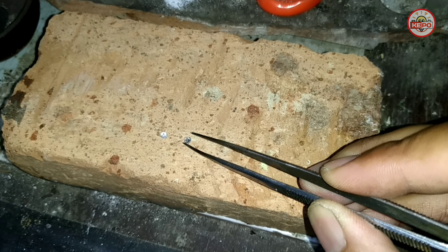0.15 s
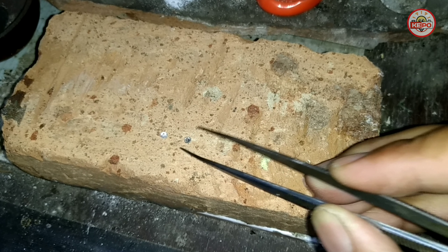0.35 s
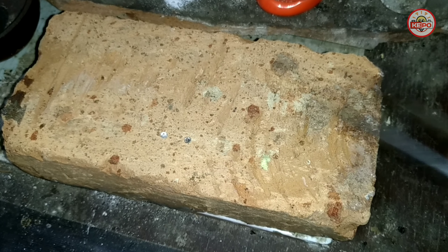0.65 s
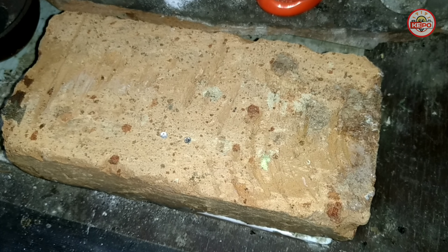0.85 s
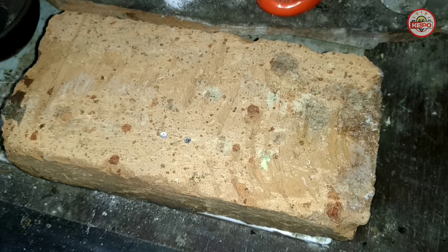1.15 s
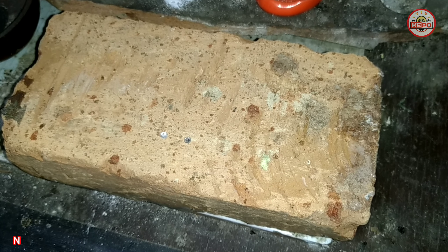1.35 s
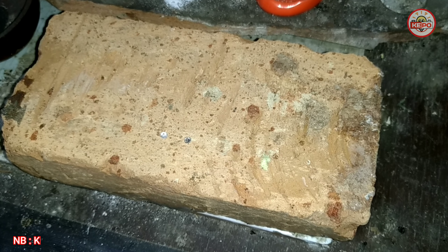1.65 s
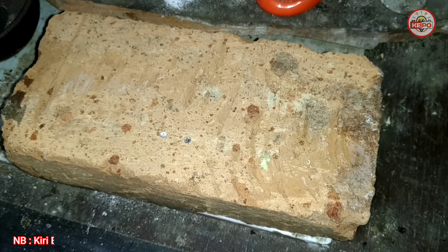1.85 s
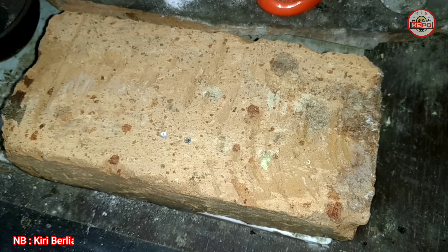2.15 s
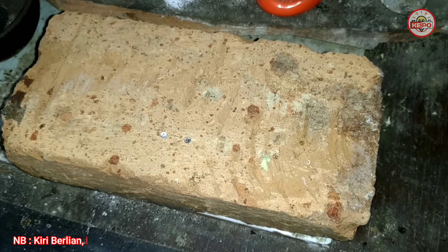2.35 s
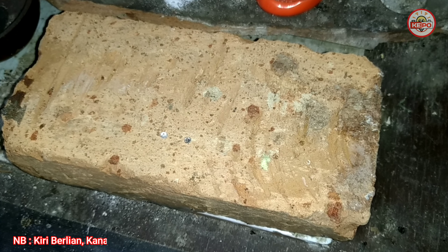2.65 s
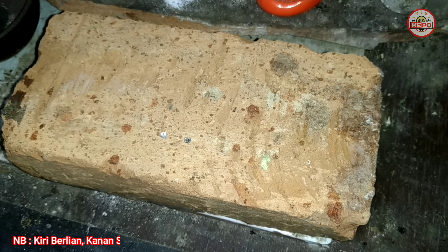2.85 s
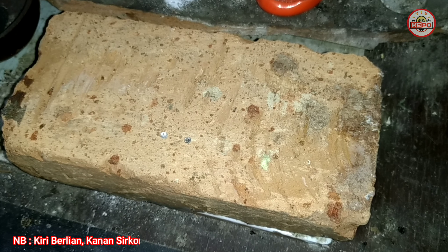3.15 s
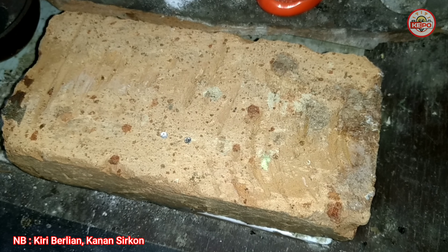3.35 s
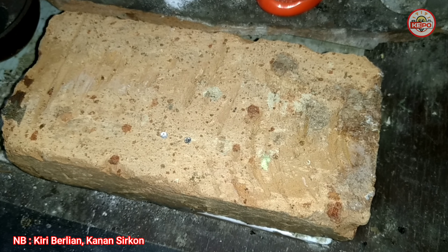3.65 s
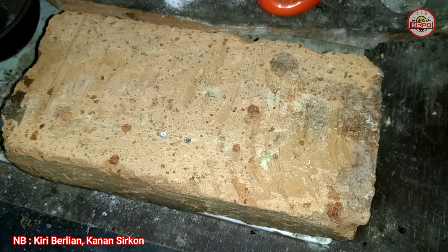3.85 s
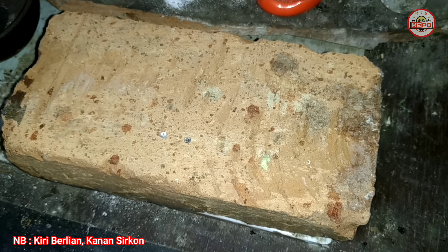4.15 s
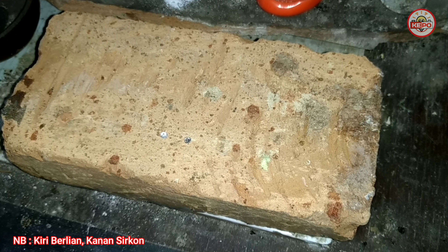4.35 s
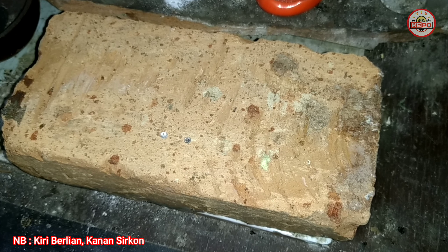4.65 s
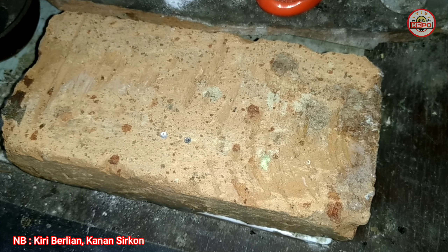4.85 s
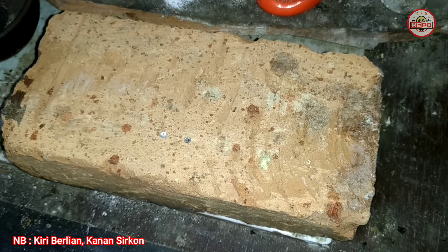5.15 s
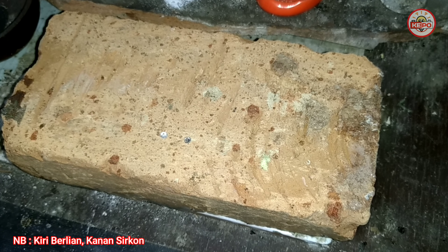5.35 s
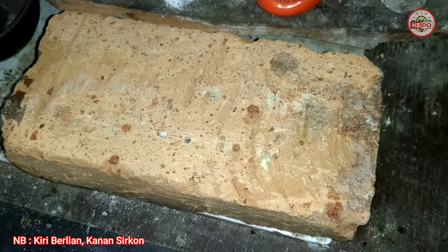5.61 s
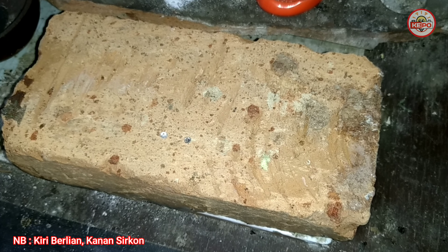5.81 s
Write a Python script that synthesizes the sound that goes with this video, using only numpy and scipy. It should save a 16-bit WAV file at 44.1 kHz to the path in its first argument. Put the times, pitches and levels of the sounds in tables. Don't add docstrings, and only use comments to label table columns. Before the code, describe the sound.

Close stereo pickup of a workbench: an early hard metallic clatter, a second smaller rattle as the tweezers settle, then sparse ticks, soft knocks and sleeve rustle. A short grainy drag swells into a tin's thud with a thin lid ring; light clinks follow, with soft low footfalls and faint room hum throughout.

```python
import sys
import numpy as np
from scipy import signal
from scipy.fft import rfft, irfft, next_fast_len
from scipy.io import wavfile
from scipy.ndimage import uniform_filter1d

SR = 44100
rng = np.random.default_rng(int(sys.argv[2]) if len(sys.argv) > 2 else 0)


def put_to_file(sound):
    columns = np.atleast_2d(sound).T
    safe = np.clip(columns, -1, 1)
    whole_steps = np.round(safe * 32767)
    wavfile.write(sys.argv[1], SR, whole_steps.astype(np.int16))


def makeup_ratio(level_db):
    decades = np.asarray(level_db, float) / 20
    return 10 ** decades


N = 263718


def evened(x):
    return x / np.sqrt(np.mean(x ** 2) + 1e-20)


def read(points, hz):
    f, value = np.transpose(points)
    return np.interp(np.log(hz + 1), np.log(f + 1), value)


def resonate(x, hz, width):
    return signal.lfilter(*signal.iirpeak(np.clip(hz, 10, SR / 2.2), hz / width, SR), x)


def peaked(x, hz, width, db):
    y = resonate(resonate(x, hz, width), hz, 2 * width)
    return makeup_ratio(db) * y / abs(y).max()


def high_pass(x, order, hz):
    return signal.lfilter(*signal.butter(order, hz, "high", fs=SR), x)


def gesture(start_s, length_s, rise_s, fall_db_per_s, swell_db=0, size=N):
    t = np.arange(size) / SR - start_s
    held_db = swell_db * np.clip(t / length_s, 0, 1) - fall_db_per_s * np.maximum(t - length_s, 0)
    return np.clip(t / rise_s, 0, 1) * makeup_ratio(held_db)


# start_s, head start of the left port [s]
HAND_PLACE = [(0, .00029), (3.36, .00025), (3.375, -.0003), (3.45, -.0003), (3.5, .0003), (3.6, .0003),
              (4.0, -.00017), (5.3, -.0002), (5.42, -.00038)]


def add(mix, start_s, sound, pan_db):
    lead_s = np.interp(start_s, *np.transpose(HAND_PLACE))
    sound = np.broadcast_to(sound, (2, sound.shape[-1]))
    for port, side in enumerate((1, -1)):
        first = round((start_s - side * lead_s / 2) * SR)
        part = mix[port, first:][:sound.shape[-1]]
        part += makeup_ratio(side * pan_db / 2) * sound[port, :len(part)]


def contact(rattle_s, chance):
    force = .5 * chance * np.exp(-np.arange(len(chance)) / SR / rattle_s)
    return force + signal.unit_impulse(len(chance))


def struck(times, blows, modes, crack_db, spread=1):
    out = np.zeros((2, N))
    hz, mode_db, t60_s = np.transpose(modes)[:, :, None]
    t = np.arange(min(SR // 2, 2000 + round(SR * t60_s.max()))) / SR
    crack = high_pass(signal.unit_impulse(len(t)), 2, 250)
    for s, (peak_db, hard_hz, rattle_s, pan_db) in zip(times, blows):
        both, apart = rng.standard_normal((2, 4000))
        apart = .4 * high_pass(apart, 1, 1000)
        chatter = np.array([contact(rattle_s, both + apart), contact(rattle_s, both - apart)])
        force = signal.lfilter(*signal.butter(3, hard_hz, fs=SR), chatter)
        spot_db = 1.5 * rng.standard_normal((len(modes), 1))
        shift_hz = spread * 3 * rng.standard_normal((len(modes), 1)) / t60_s
        decay = makeup_ratio(mode_db + spot_db - 60 * t / t60_s)
        ring = (decay * np.sin(2 * np.pi * (hz + shift_hz) * t)).sum(0)
        sound = signal.fftconvolve((ring + makeup_ratio(crack_db) * crack)[None], force, axes=1)
        add(out, s, makeup_ratio(peak_db) * sound / abs(sound).max(), pan_db)
    return out


DROP_START = [.3145, .3565, .3605, .3645, .3715, .3795, .3965]
# peak_db, hardness_hz, rattle_s, left_right_db
DROP_BLOWS = [
    (-50.5, 4900, 0.0046, 6),
    (-12.5, 2000, 0.003, 3.5),
    (-13, 800, 0.00082, -2),
    (-11.5, 750, 0.001, 1),
    (-18, 3000, 0.0063, 6),
    (-21.5, 2750, 0.007, 4),
    (-30, 1800, 0.008, -2),
]
# pitch_hz, level_db, t60_s
BENCH_MODES = [(130.6, -14.5, .325), (335, -12, .03), (383, -12.5, .04), (514, 0, .035), (591, -8.5, .07),
               (689, -2, .05), (945, 3, .04), (1147, 2, .04), (1387, 2, .035), (1613, 1, .03),
               (1890, 4, .025), (2283, 0, .03), (2820, 0.5, .02), (3126, -1, .025), (3900, -3, .012),
               (4360, 3, .012), (4670, 2, .012)]
STEEL_START = [.361, .3712]
# peak_db, hardness_hz, rattle_s, left_right_db
STEEL_BLOWS = [(-55, 14000, 0.0043, 2), (-50, 16000, .004, 2)]
# pitch_hz, level_db, t60_s
STEEL_MODES = [(6120, -4, .09), (7140, -6, .16), (8480, -9, .06), (9070, -5, .05), (10000, -3, .07),
               (11050, 0, .05), (11800, -2, .05), (13400, -4, .05)]
# peak_db, hardness_hz, rattle_s, left_right_db
TIP_BLOW = [(-28, 6000, .004, 6)]
# pitch_hz, level_db, t60_s
TIP_MODES = [(4400, 0, .008)]


def tweezers_drop():
    bench = struck(DROP_START, DROP_BLOWS, BENCH_MODES, crack_db=29, spread=.4)
    steel = struck(STEEL_START, STEEL_BLOWS, STEEL_MODES, crack_db=0)
    tips = struck([.376], TIP_BLOW, TIP_MODES, crack_db=-8, spread=0)
    return bench + steel + tips


SETTLE_START = [.5916, .5985, .6065, .6138, .634, .651, .689, .741, .776, .810, .844, 4.053]
# peak_db, hardness_hz, rattle_s, left_right_db
SETTLE_BLOWS = [(-39, 5000, .004, 1.5), (-38, 1020, .0015, -1), (-30, 2800, .003, 2.2), (-20, 3500, .01, 2),
                (-31, 4000, .006, 1), (-31, 2200, .012, 2), (-34, 1500, .012, 1), (-40, 1500, .006, 1),
                (-33, 1900, .005, 2.2), (-39, 1900, .005, 2), (-47, 960, 0.0073, 0), (-44, 980, .027, -1)]
# pitch_hz, level_db, t60_s
TWEEZERS_MODES = [(355, -20, .05), (604, -10, .08), (724, -8, .06), (805, 8, .05), (833, -8, .25),
                  (904, -4, .08), (1080, -3, .03), (1312, 2, .04), (1657, 5, .035), (1758, 3, .06),
                  (2130, 3, .03), (2510, -4, .03), (3220, 4, .02), (3400, -8, .04), (3700, -8, .03),
                  (4370, 3, .0086)]


def tweezers_settle():
    return struck(SETTLE_START, SETTLE_BLOWS, TWEEZERS_MODES, crack_db=26, spread=.2)


ARMS_START = [.6145, .645, .69]
# peak_db, hardness_hz, rattle_s, left_right_db
ARMS_BLOWS = [(-57, 6800, 0.00003, 0.77), (-66, 6000, .00003, 0.76), (-70, 6000, .00003, 1)]
# pitch_hz, level_db, t60_s
ARM_MODES = [(3984, 0, .8)]
TOP_START = [.5985, .72, .812, 2.329]
# peak_db, hardness_hz, rattle_s, left_right_db
TOP_BLOWS = [(-38, 120, 0.0034, 2.3), (-39.5, 117, 0.0067, 1.5), (-39, 136, 0.0024, 1.4),
             (-39, 340, 0.0042, 1.4)]
# pitch_hz, level_db, t60_s
TOP_MODES = [(146.9, 0, 0.653)]


def long_rings():
    arms = struck(ARMS_START, ARMS_BLOWS, ARM_MODES, crack_db=0)
    return arms + struck(TOP_START, TOP_BLOWS, TOP_MODES, crack_db=0)


THUD_START = [4.6324, 4.6352, 4.6382, 4.6445]
# peak_db, hardness_hz, rattle_s, left_right_db
THUD_BLOWS = [
    (-12, 640, 0.00003, 0),
    (-16, 530, 0.000027, 0),
    (-14, 500, 0.00003, 0),
    (-22.5, 1300, 0.0029, 0),
]
# pitch_hz, level_db, t60_s
TIN_MODES = [(75, -12, .1), (170, -9, .1), (224, 7, .09), (286, 16, .07), (338, 24.5, .022),
             (381, 14, .065), (440, 12, .05), (520, 20, .035), (586, 12, .035), (874, 16.5, .03)]
LID_START = [4.0495, 4.647, 4.657]
# peak_db, hardness_hz, rattle_s, left_right_db
LID_BLOWS = [
    (-47, 7800, 0.00007, 0),
    (-41.5, 8300, 0.001, 0),
    (-40.5, 6000, 0.002, 0),
]
# pitch_hz, level_db, t60_s
LID_MODES = [(2500, 7, .012), (4220, -3, 0.163), (4180, -8, .12), (6535, -13, 0.18), (6200, -7.5, .02),
             (9545, -4, .06)]


def tin_set_down():
    thud = struck(THUD_START, THUD_BLOWS, TIN_MODES, crack_db=6.6, spread=.1)
    return struck(LID_START, LID_BLOWS, LID_MODES, crack_db=14.4) - thud


CLINKS_START = [5.18, 5.277, 5.31, 5.37, 5.4235, 5.445, 5.484]
# peak_db, hardness_hz, rattle_s, left_right_db
CLINK_BLOWS = [(-45, 6600, 0.002, .2), (-51, 3900, 0.001, .2), (-54, 2200, .001, .2), (-60, 1900, 0.001, 0),
               (-44, 5500, 0.0011, 0), (-54, 5000, .001, 0), (-59, 2400, .001, 0)]
# pitch_hz, level_db, t60_s
TOOL_MODES = [(2011, -2, 0.23), (2050, -6, .1), (2860, -13, .1), (3100, 0, .08), (3130, -3, .2),
              (3220, -6, .2), (3700, -4, .1), (3860, -9, 0.09), (4540, -9, 0.091), (4800, -10, .08)]
# peak_db, hardness_hz, rattle_s, left_right_db
NEIGHBOUR_BLOW = [(-51, 6000, .00003, 0)]
# pitch_hz, level_db, t60_s
NEIGHBOUR_MODES = [(2638, 0, .16)]


def tool_clinks():
    clinks = struck(CLINKS_START, CLINK_BLOWS, TOOL_MODES, crack_db=6.6)
    return clinks + struck(CLINKS_START[4:5], NEIGHBOUR_BLOW, NEIGHBOUR_MODES, crack_db=0)


# (pitch_hz, level_db, t60_s)
SMALL_THINGS = [
    (2.282, (-31.5, 1500, .006, 0), [(373, 6, .09), (520, 0, .04), (986, 4, .02), (1650, 1, .03), (2620, 0, .012), (3130, 0, .015)]),
    (2.3286, (-32, 4500, .003, 1), [(515, -2, .03), (950, -3, .025), (1620, 1, .09), (1900, -8, .06), (2400, 6, .01), (3900, 5, .007)]),
    (3.3292, (-29.5, 6000, .004, 2), [(458, 2, .03), (754, -3, .02), (1135, -2, .018), (2330, -8, .04), (2610, -8, .02), (2980, -2, .02), (3400, 1, .014), (3700, -4.5, .018), (5230, 4.5, .014)]),
    (3.531, (-32.5, 5000, .004, 4.5), [(571, -2, .05), (1210, -3, .025), (1510, 13, .025), (2146, 0, .025), (2700, -8, .035), (4150, 3, .012), (4800, -4, .01)]),
]


def things_put_down():
    return sum(struck([s], [blow], modes, crack_db=22, spread=.1) for s, blow, modes in SMALL_THINGS)


# start_s, peak_db, pitch_hz, fizz re tap [dB], left_right_db
TICK_EVENTS = [(1.247, -43, 2600, -12, 2), (2.329, -45, 3500, -5, 0), (2.3894, -50.5, 4530, -13, 3),
               (2.43, -50, 4120, -13, 2), (2.8923, -58, 2970, 2, -10), (2.996, -49.5, 5250, -6, -3),
               (3.0219, -47, 2500, 0.5, -4), (3.1428, -51.5, 4170, 10, -2), (3.1527, -42, 4450, 8.5, 6),
               (3.1671, -46, 2210, -9, 1), (3.3298, -48, 3300, 8, 3), (3.5322, -49, 3800, 0, 4),
               (4.5569, -52, 2330, -27, 5)]
SCUFF_EVENTS = [(1.5176, -55, 3200, -8, 2), (2.281, -52, 3000, -23, 1), (3.425, -49, 2440, -14, 10),
                (4.0486, -48, 2250, -26, 10.5), (4.646, -39, 2580, -23, -4), (5.428, -43, 3170, -10, 10.5),
                (5.949, -48.5, 2670, -11, 2)]


def ticks_and_scuffs():
    out = np.zeros((2, N))
    for events, chatter_s in ((TICK_EVENTS, .0055), (SCUFF_EVENTS, .016)):
        for s, peak_db, hz, fizz_db, pan_db in events:
            force = np.array([contact(chatter_s, c) for c in rng.standard_normal((4, 4000))])
            force[:2] += force[:2].sum(0)
            tick = peaked(force[:2], hz, .6 * hz, peak_db)
            fizz = peaked(force[2:], 11200, 4700, peak_db + fizz_db)
            add(out, s, tick + fizz, pan_db)
    return out


# start_s, peak_db, pitch_hz, chatter_s
KNOCK_EVENTS = [(1.984, -54.5, 190, 0.012), (2.119, -47, 201, 0.0044), (2.329, -35, 176, 0.0035),
                (2.435, -59, 264, 0.0089), (3.101, -50, 434, 0.056), (3.383, -37, 626, 0.0055),
                (3.49, -45.5, 194, 0.018), (3.872, -46, 366, 0.029), (4.049, -51, 474, 0.06),
                (4.169, -43.5, 227, 0.0033), (4.227, -45.5, 450, 0.017), (5.118, -39, 590, 0.0049),
                (5.952, -40.5, 445, 0.0085)]


def knocks():
    out = np.zeros((2, N))
    for s, peak_db, hz, chatter_s in KNOCK_EVENTS:
        force = contact(chatter_s, rng.standard_normal(4000))
        add(out, s, peaked(force, hz, .5 * hz, peak_db), pan_db=.5)
    return out


def flutter_db(size):
    return 1.5 * np.interp(np.arange(size) / SR / .02, np.arange(200), rng.standard_normal(200))


# start_s, length_s, level_db, swell over the stroke [dB]
DRAG_STROKES = [
    [(.01, 0.11, -67, 0), (.14, 0.18, -72.5, -2.5), (.312, .012, -71, -6)],
    [(3.893, 0.1, -67.5, -12)],
    [(4.148, 0.11, -65, 0.5)],
    [(4.359, 0.26, -62.5, 5)],
]
# pitch_hz, width_hz, level_db
DRAG_PEAKS = [
    [(1244, 130, 2.5), (1377, 16, 0), (4360, 86, -10)],
    [(1470, 72, 6.5), (4300, 90, -20)],
    [(444, 33, 4), (654, 60, -1), (1110, 69, -2), (1240, 62, -5.5), (2330, 180, -4)],
    [(387, 40, -5.5), (451, 37, 3.5), (775, 43, -5.5), (1135, 36, 1), (1230, 60, -8), (1777, 51, -12),
     (2320, 50, -3), (2400, 42, -11)],
]


def scrapes():
    out, size = np.zeros((2, N)), SR // 2
    for strokes, peaks in zip(DRAG_STROKES, DRAG_PEAKS):
        grains = makeup_ratio(2.0 * rng.exponential(1, size))
        both, apart = rng.standard_normal((2, size)) * grains
        grit = both + .6 * np.array([apart, -apart])
        body = sum(makeup_ratio(db + flutter_db(size)) * evened(resonate(grit, hz, width)) for hz, width, db in peaks)
        start = strokes[0][0]
        press = sum(makeup_ratio(db) * gesture(s - start, length, .012, 401, swell_db, size)
                    for s, length, db, swell_db in strokes)
        add(out, start, makeup_ratio(-3) * press * body, pan_db=0)
    return out


# pitch_hz, likeness
PORT_LIKENESS = [(60, 0.38), (150, -0.015), (300, 0.66), (600, 0.12), (1400, -0.19), (3000, -0.012)]


def noise(colour, patchy_db, size=1024):
    frames, hz = 4 * N // size + 5, np.fft.rfftfreq(size, 1 / SR)
    a, b, c, d, patches = rng.standard_normal((frames, len(hz), 5)).T
    patches = uniform_filter1d(patches, size=size // 80, axis=0)
    patches = evened(uniform_filter1d(patches, size=8192 // size, axis=1))
    same = np.clip(read(PORT_LIKENESS, hz), -1, 1)[:, None]
    left = a + 1j * b
    z = np.array([left, same * left + np.sqrt(1 - same ** 2) * (c + 1j * d)])
    z *= makeup_ratio(read(colour, hz)[:, None] + patchy_db * patches)
    return evened(signal.istft(z, nperseg=size, noverlap=3 * size // 4)[1][:, :N])


# start_s, length_s, effort_db,
# brightness_db
SLEEVE_MOVES = [(0.0, 0.099, -60.5, 3.5), (0.483, 0.22, -52.5, -9), (0.622, 0.68, -65, -1.5),
                (1.222, 0.3, -73.5, 14), (2.02, 0.24, -58.5, -8.5), (2.26, 0.16, -51, -3),
                (2.856, 0.19, -70, 13.5), (3.103, 0.05, -51.5, -1), (3.432, 0.34, -57, -4.5),
                (3.86, 0.89, -58, -4), (4.318, 0.25, -52, -7), (4.628, 0.01, -29.5, -19),
                (4.978, 0.795, -58, 1), (5.4, 0.21, -57.5, 7.5), (5.883, .1, -67.5, 13.5)]
# pitch_hz, level_db
RUSTLE_COLOURS = [
    [(120, -11.5), (230, 4), (600, -6), (1100, -11), (2500, -64.5)],
    [(500, -66), (1200, -1.5), (2500, -1), (5000, -8.5), (7500, -29), (10000, -48)],
    [(5000, -15), (8000, -12), (11000, -13.5), (14500, -18), (17000, -16.5)],
]
# resting_db, re effort [dB], share of brightness
RUSTLE_LEVELS = [
    (-67, -4.5, 0.21),
    (-74.5, -9.5, 0.85),
    (-75.5, -15, 1.13),
]


def rustle():
    shapes = np.array([gesture(s, length, .01, 104) ** 2 for s, length, *_ in SLEEVE_MOVES])
    effort_db, bright_db = np.transpose(SLEEVE_MOVES)[2:]
    out = np.zeros((2, N))
    for colour, (rest_db, db, share) in zip(RUSTLE_COLOURS, RUSTLE_LEVELS):
        power = makeup_ratio(rest_db) ** 2 + makeup_ratio(effort_db + db + share * bright_db) ** 2 @ shapes
        out += np.sqrt(power) * noise(colour, patchy_db=2.3, size=256)
    return out


# start_s, length_s, level_db, pitch_hz
FOOTFALLS = [(0.0, 0.023, -53.5, 70.5), (0.364, 0.044, -55, 80), (.37, 0.061, -64, 150),
             (1.981, 0.044, -49, 71), (2.123, 0.064, -53.5, 56), (2.151, 0.18, -54.5, 122),
             (2.295, 0.12, -56, 74), (2.449, 0.034, -50.5, 54), (2.562, 0.15, -64, 94),
             (3.041, 0.086, -47.5, 62.4), (3.325, 0.028, -57, 170), (3.468, 0.15, -47.5, 86.7),
             (3.505, 0.25, -56, 54.3), (3.87, 0.055, -43.5, 75.3), (4.048, 0.054, -56, 93),
             (4.155, 0.039, -46, 86.5), (4.26, 0.095, -64, 95), (4.393, 0.23, -55, 85),
             (4.64, 0.029, -35, 76.6), (4.707, 0.092, -54.5, 55), (4.793, 0.37, -49.5, 92.7),
             (5.14, .07, -48, 72), (5.727, 0.093, -53, 57), (5.887, 0.12, -52.5, 90)]


def footfalls():
    out = np.zeros(N)
    for s, length, db, hz in FOOTFALLS:
        start, shake = round(s * SR), rng.standard_normal(SR)
        sway = signal.hilbert(resonate(resonate(shake, hz, .3 * hz), hz, hz))
        steadied = (sway / (abs(sway) + 1e-9) ** .46).real
        sway = evened(steadied)[SR // 4:][:N - start]
        out[start:start + len(sway)] += makeup_ratio(db) * sway * gesture(0, length, .0045, 165, size=len(sway))
    return out * makeup_ratio([[.4], [-.4]])


# start_s, level_db
ENGINE_THROB = [
    (5.3, -77),
    (5.55, -51.5),
    (5.7, -61),
    (5.9, -82),
    (5.98, -64),
]
# pitch_hz, width_hz, resting_db, engine coupling [dB]
ROOM_MODES = [(59.4, 8.6, -66.5, -36), (100.2, 13.8, -68, -22.5), (150, 3.55, -73.5, -23)]


def booms():
    t = np.arange(N) / SR
    throb_db = np.interp(t, *np.transpose(ENGINE_THROB), -150, -150)
    out = makeup_ratio(throb_db) * np.sin(2 * np.pi * 31.3 * t)
    for hz, width, rest_db, engine_db in ROOM_MODES:
        both, apart = rng.standard_normal((2, N))
        drive = both + .082 * np.array([apart, -apart])
        level = makeup_ratio(rest_db) + makeup_ratio(engine_db + .43 * throb_db)
        out = out + level * evened(resonate(resonate(drive, hz, width), hz, 10.6 * width))
    return out


# pitch_hz, level_db per Hz
AIR_COLOUR = [(15, -50), (25, -13), (43, -37), (108, 13.5), (170, -16.5), (301, -9.5), (439, -27),
              (531, -44), (754, -22), (1100, -12), (1230, -13.5), (2110, -14), (2840, -35.5), (14800, -32),
              (16000, -63)]
# pitch_hz, width_hz, level_db
MACHINE_HUM = [(103.1, 3.6, -65.5), (481.5, 7.3, -77.5), (522.6, 2.5, -71)]


def still_air():
    line = makeup_ratio(-72) * np.sin(2 * np.pi * 527.6 * np.arange(N) / SR)
    halo = np.zeros(N)
    for hz, width, db in MACHINE_HUM:
        halo += makeup_ratio(db) * evened(resonate(resonate(rng.standard_normal(N), hz, width), hz, 12 * width))
    return makeup_ratio(-69.5) * noise(AIR_COLOUR, patchy_db=1.7) + halo + line


# pitch_hz, t60_s
ROOM_DECAY = [(100, 0.34), (400, 0.17), (1500, 0.25), (5000, 0.15), (12000, 0.18)]
# pitch_hz, likeness
ROOM_LIKENESS = [(100, .99), (300, .95), (700, .75), (1500, .2), (4000, 0)]


def room(x):
    echoes = np.zeros((2, 30000))
    at = np.arange(200, 30000, 20) + rng.integers(0, 20, (2, 1490))
    np.put_along_axis(echoes, at, rng.choice([-1., 1.], at.shape), 1)
    hz, t, (a, b) = signal.stft(echoes, SR, nperseg=256)
    same = read(ROOM_LIKENESS, hz)[:, None]
    z = np.array([a, same * a + np.sqrt(1 - same ** 2) * b])
    z = z * makeup_ratio(-60 * t / read(ROOM_DECAY, hz)[:, None])
    tail = signal.istft(z, SR, nperseg=256)[1]
    return signal.fftconvolve(.8 * x[:1], tail / np.linalg.norm(tail[0]), axes=1)[:, :N]


def scene():
    tweezers = high_pass(tweezers_drop() + tweezers_settle(), 2, 95)
    around = tweezers + ticks_and_scuffs() + knocks() + scrapes()
    drier = tin_set_down() + tool_clinks() + things_put_down()
    reverb = makeup_ratio(-3.5) * room(around + makeup_ratio(-5) * drier)
    background = rustle() + footfalls() + booms() + still_air()
    return around + drier + reverb + long_rings() + background


def top_cut(x):
    return signal.sosfilt(signal.butter(12, 16410, fs=SR, output="sos"), x)


# pitch_hz, left_right_db
PORT_BALANCE = [(80, -0.1), (150, 1.5), (330, -1.5), (700, .5), (1500, 0.5)]
# pitch_hz, level_db
MICROPHONE_COLOUR = [(2000, 0), (6000, 2), (7800, -6), (10000, -1), (15200, 3.5), (16000, -22)]


def record(dry):
    thinned = high_pass(dry, 3, 48)
    size = next_fast_len(N)
    balance_db = read(PORT_BALANCE, np.fft.rfftfreq(size, 1 / SR)) * [[.5], [-.5]]
    balanced = irfft(rfft(thinned, size) * makeup_ratio(balance_db), size)[:, :N]
    hz = np.linspace(0, SR / 2, 200)
    colour = signal.firwin2(129, hz, makeup_ratio(read(MICROPHONE_COLOUR, hz)), fs=SR)
    padded = np.pad(balanced, ((0, 0), (64, 64)), "reflect")
    return top_cut(signal.oaconvolve(padded, colour[None], "valid", axes=1))


dry = scene()
out = record(dry)
put_to_file(out)
```